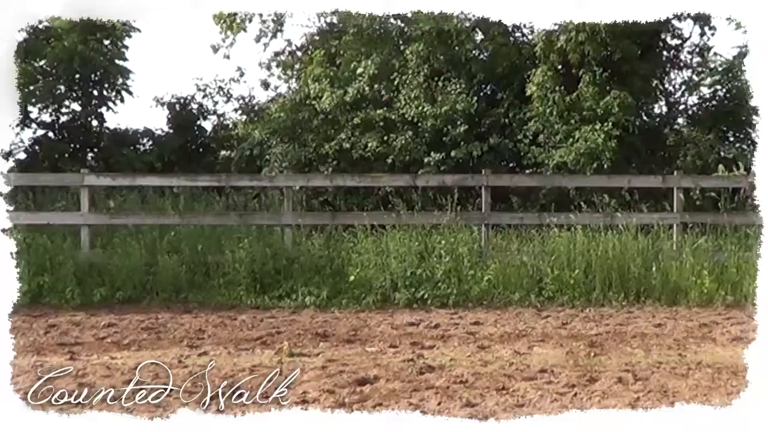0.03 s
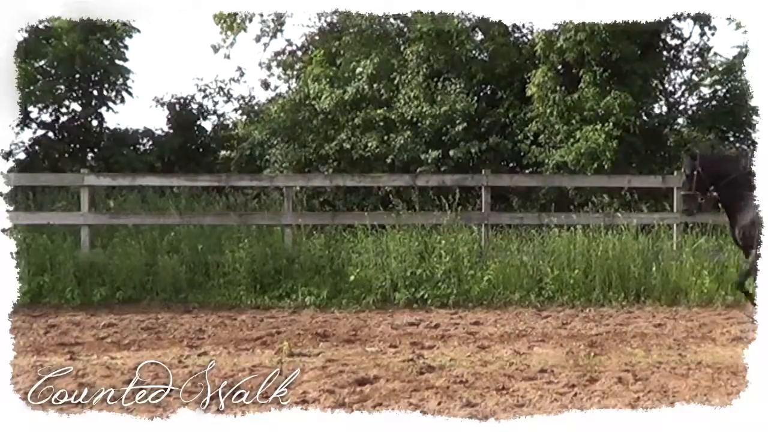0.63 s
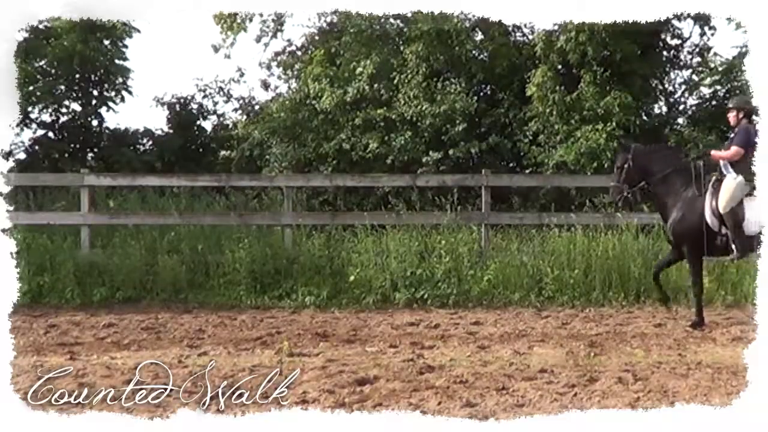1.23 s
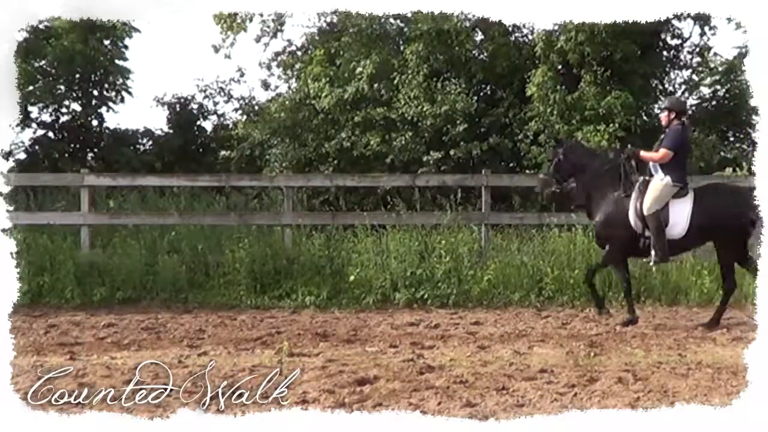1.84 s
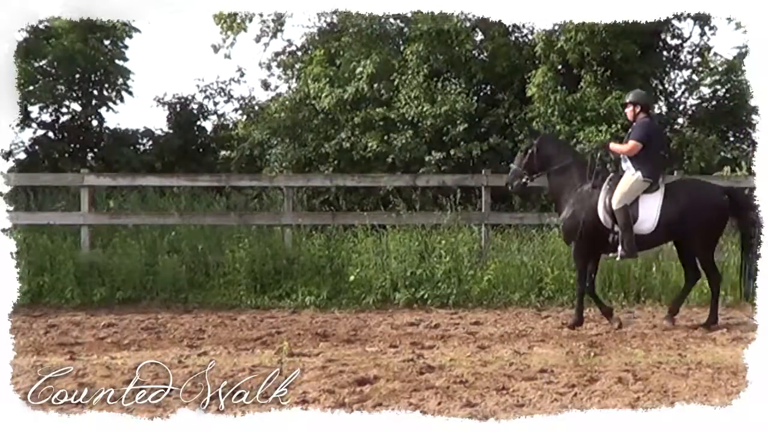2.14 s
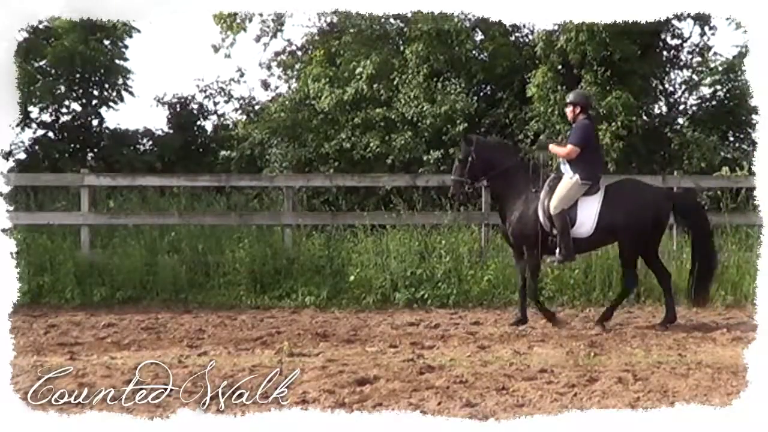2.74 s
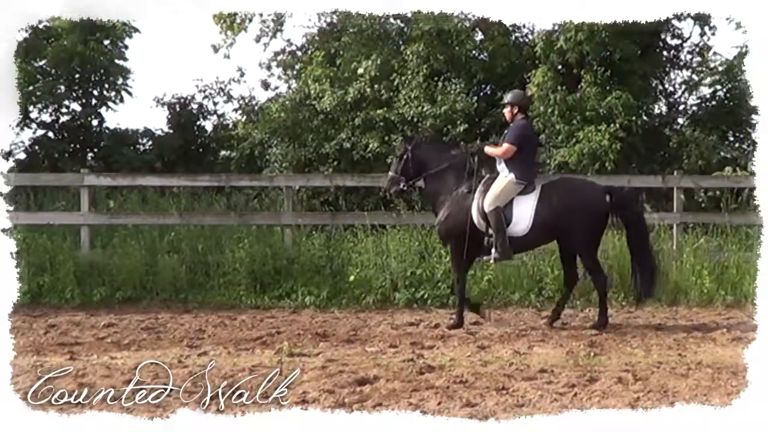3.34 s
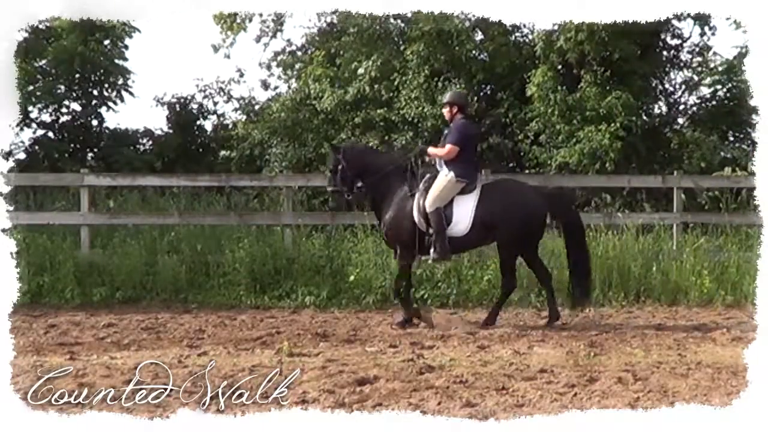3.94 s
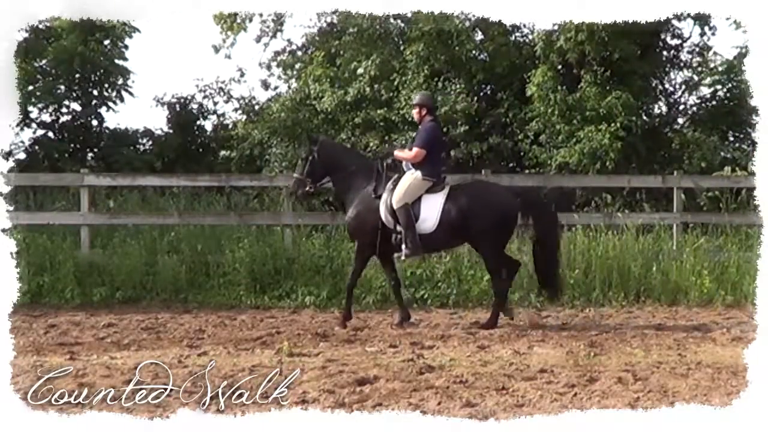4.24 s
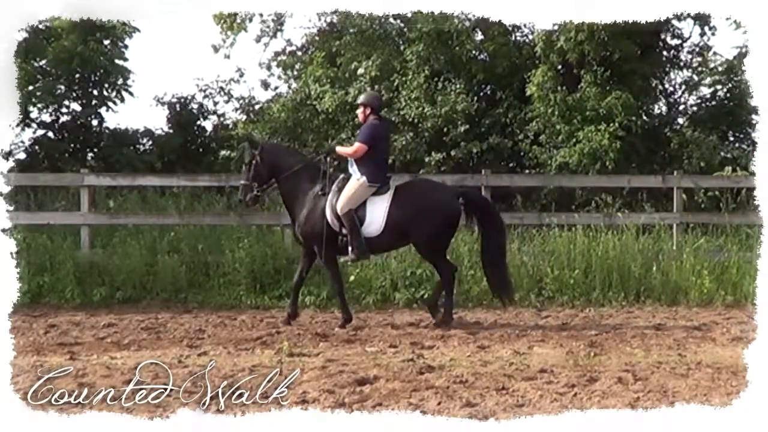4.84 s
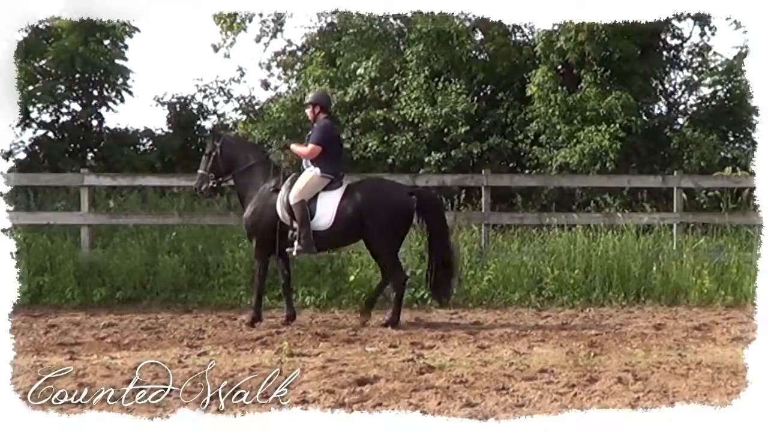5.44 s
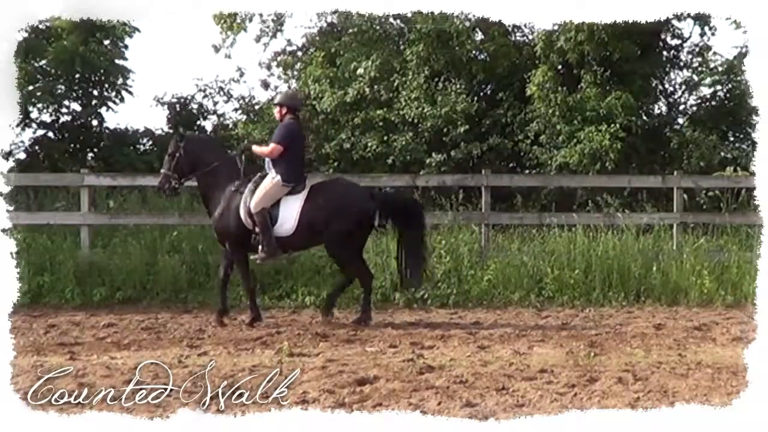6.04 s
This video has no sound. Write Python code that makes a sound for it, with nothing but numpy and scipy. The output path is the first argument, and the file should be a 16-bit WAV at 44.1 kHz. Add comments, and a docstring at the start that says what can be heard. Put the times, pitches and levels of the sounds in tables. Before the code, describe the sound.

Birds chirp and trill over a low outdoor rumble while a horse walks softly on sand with faint tack clicks.

```python
"""Birdsong around a riding arena

Birds sing in the trees while a horse walks slowly across sand, hooves knocking and scuffing, tack ticking.
A near songbird on the right slurs and trills; a farther one warbles, others whistle, chip and chuck.
The songs are gliding, fluttering tones; the chucks are puffs of noise ringing a small throat.
Underneath lie a low country rumble, a far hum, a distant engine that grows and a faint, thin whine."""
import sys
import numpy as np
from scipy import signal
from scipy.fft import rfft, irfft
from scipy.io import wavfile
from scipy.ndimage import uniform_filter1d, map_coordinates

SR = 44100
rng = np.random.default_rng(int(sys.argv[2]) if len(sys.argv) > 2 else 0)


def waveform_to_disk(signal):
    """Save audio, clipped to [-1, 1], as 16-bit WAV at the path in sys.argv[1]."""
    frames = np.transpose(np.atleast_2d(signal))
    scaled = np.clip(frames, -1, 1) * 32767
    samples = np.round(scaled).astype(np.int16)
    wavfile.write(sys.argv[1], SR, samples)


N = 268569
TIME = np.arange(N) / SR

# Table levels are relative, set ahead of the mix.
# The tone of the country air. Each row: frequency in Hz, level in dB.
AIR_SPECTRUM = [(25, -60), (48, -54), (64, -19.5), (80, -14.5), (126, -4.5), (246, -3.5), (359, -14),
                (552, -16), (1340, -14.5), (1660, -20.5), (2700, -20), (4380, -21), (8000, -28),
                (15500, -31.5)]
# How alike the air is left and right. Each row: frequency in Hz, correlation (1 is mono).
AIR_LIKENESS = [(60, 0.97), (200, 1), (380, 0.74), (700, 0.21), (1290, 0.25), (2400, 0.38), (4400, 0.44),
                (8000, 0.57), (12000, 1), (15000, 1)]
# Narrow humps that colour the air. Each row: centre in Hz, width in Hz, boost in dB.
AIR_HUMPS = [(278, 73, 1.5), (1197, 53, 3.5), (5515, 200, 7), (9870, 210, 3.5)]
# The engine's growth. Each row: time in seconds, then levels of harmonics 1, 3 and 4 in dB.
ENGINE_LEVELS = [(0, -74, -82, -81), (2.4, -75, -72, -78), (2.9, -60, -74.5, -68), (3.4, -72, -74.5, -79),
                 (3.85, -68, -63, -65), (4.2, -64, -62, -68), (4.5, -62, -72, -64.5),
                 (4.8, -60.5, -75, -63.5), (5.05, -53.5, -66.5, -69.5), (5.5, -55.5, -70, -69.5),
                 (6.09, -56.5, -67.5, -66)]
# Weaker engine lines. Each row: multiple of the firing rate, level against harmonic 3 in dB.
ENGINE_WEAK_LINES = [(4.5, -7.5), (5, -19)]
# The far hum coming and going. Each row: time in seconds, level in dB.
HUM_LEVELS = [(0.1, -79), (0.27, -55), (1.18, -69.5), (2.21, -65), (2.33, -76), (2.41, -61.5),
              (4.53, -65.5), (5.05, -52), (5.3, -65.5), (6.08, -61.5)]
# Hooves pushing through sand. Each row: middle in seconds, length in seconds, level in dB.
HOOF_SCUFFS = [(0.21, 0.089, -55.5), (0.694, 0.17, -50), (2.19, 0.16, -57.5), (2.372, 0.22, -57),
               (2.471, .1, -51.5), (3.824, 0.11, -55.5), (4.267, 0.066, -57), (4.917, 0.073, -61),
               (5.877, 0.15, -58), (6.051, 0.048, -57.5)]
# The tone of the crunch. Each row: frequency in Hz, level in dB.
SAND_SPECTRUM = [(150, -32), (350, -5), (650, 4), (1100, 1.5), (1600, -9), (3000, -11), (6000, -17),
                 (15000, -41)]
# The warbler's flick. Each row: delay and length in seconds, start, middle and end in Hz, level in dB.
FLICK_NOTES = [(0, 0.048, 2740, 2810, 2780, -53.5), (.038, .062, 2794, 3044, 2130, -45)]
# Its three flicks. Each row: start in seconds, gain in dB, pitch factor.
FLICK_REPEATS = [(0.217, -1, 0.99), (3.183, 0.5, 0.98), (5.411, -1, 1)]
# Its long phrases, one curve apiece. Each row: time in seconds, pitch in Hz, level in dB.
WARBLE_CURVES = [
    [(0.66, 3020, -57), (0.685, 2520, -50), (0.71, 2270, -46), (0.728, 2388, -43), (0.738, 2480, -56),
     (0.746, 2335, -44), (0.768, 2060, -46), (0.792, 2050, -46), (0.82, 2210, -44), (0.844, 2195, -53),
     (0.862, 2170, -51), (0.892, 2350, -44.5), (0.945, 2340, -38.5), (0.995, 2332, -52)],
    [(2.06, 3043, -52), (2.102, 2427, -46), (2.124, 2479, -47), (2.14, 3000, -48), (2.255, 3050, -48),
     (2.284, 2555, -46), (2.33, 2540, -48)],
    [(3.635, 2350, -50), (3.663, 2700, -44.5), (3.701, 2410, -39), (3.733, 2366, -47.5), (3.773, 2080, -46),
     (3.813, 2283, -41.5), (3.85, 2130, -51)],
    [(4.235, 3210, -59), (4.243, 3190, -45), (4.337, 2400, -42.5), (4.355, 2698, -66), (4.391, 2470, -41.5),
     (4.47, 2516, -44)],
    [(5.91, 2973, -51), (5.956, 2299, -47), (5.98, 2450, -47), (6.012, 2048, -45), (6.044, 2043, -45.5),
     (6.058, 2240, -48), (6.085, 2180, -50)],
]
# Its single slurs. Each row: start and length in seconds, start, middle and end in Hz, level in dB.
WARBLER_SLURS = [(0.726, .02, 2400, 2700, 2950, -49), (1.397, 0.078, 2680, 2825, 2840, -46.3),
                 (1.463, 0.096, 2160, 2186, 2245, -47.5), (1.571, 0.041, 2910, 3060, 3000, -45),
                 (1.604, 0.06, 2735, 2550, 2560, -47.5), (5.663, 0.028, 3430, 2970, 2700, -53)]
# Small clicks of the tack. Each row: start in seconds, level in dB.
TACK_TICKS = [(.312, -40.5), (.44, -38), (.775, -37), (1.07, -43), (1.236, -41), (2.124, -37.5),
              (4.506, -42.5), (4.733, -45), (5.662, -40), (6.047, -40)]
# Hoarse chucks. Each row: start in seconds, length in seconds, level in dB.
CHUCK_CALLS = [(0.361, 0.056, -54.5), (1.424, 0.044, -57), (2.686, 0.093, -60), (4.043, 0.051, -57),
               (4.085, 0.057, -54), (4.859, 0.025, -50), (5.335, 0.027, -63)]
# The chucking bird's throat. Each row: resonance in Hz, width in Hz, level in dB.
THROAT_RESONANCES = [(1656, 160, 7.5), (1910, 130, 7.5), (3960, 1400, -6.5)]
# Hooves landing. Each row: start in seconds, level in dB, pitch the thud settles on in Hz.
HOOF_KNOCKS = [(.371, -39.5, 467), (0.592, -40.5, 560), (1.236, -39, 1160), (2.124, -38.5, 400),
               (2.145, -38.5, 503), (2.184, -39.5, 422), (2.476, -42, 900), (4.184, -33.5, 470),
               (4.261, -39, 660), (4.505, -35, 1213), (4.931, -35, 560), (5.662, -29.5, 600),
               (5.823, -39, 840)]
# Thin chips; the last row is a tone ringing with the chuck at 4.859 s. Each row: start and length in seconds,
# start, middle and end in Hz, level in dB.
CHIP_NOTES = [(0.755, 0.037, 4340, 4350, 4230, -54), (1.812, 0.022, 9050, 7560, 6840, -45),
              (1.827, 0.082, 6950, 7200, 7450, -46), (2.966, 0.022, 5560, 5550, 5500, -52),
              (3.013, 0.034, 5800, 5320, 5760, -52.5), (4.859, 0.021, 4100, 3980, 3900, -50.5)]
# A flat whistle with an upturned end. Each row: time in seconds, pitch in Hz, level in dB.
WHISTLE_CURVE = [(1.757, 3800, -66), (1.768, 3828, -52.5), (1.79, 3730, -52), (1.81, 3830, -45.5),
                 (1.874, 3790, -44.5), (1.898, 4064, -40.5), (1.912, 4060, -60)]
# The near songbird's two syllables.
# Each row: delay and length in seconds, start, middle and end in Hz, level in dB.
SWEEP_NOTES = [(0, .038, 4110, 4100, 3400, -41), (.056, 0.035, 4400, 4745, 4680, -38.7),
               (.097, .107, 7600, 6350, 5650, -40)]
SPIKE_NOTES = [(.002, .065, 5224, 4950, 4510, -37.5), (.071, .024, 5300, 6600, 8400, -39),
               (.095, .017, 8300, 6650, 5400, -43), (.126, .08, 2880, 3505, 3190, -44)]
# It sings each twice. Each row: start in seconds, gain in dB, pitch factor.
SWEEP_REPEATS = [(3.09, -4.5, 0.98), (3.362, -0.5, 0.99)]
SPIKE_REPEATS = [(3.656, -0.18, 1.005), (3.93, 0, .995)]
# Its slide. Each row: share of the length, pitch in Hz, level in dB, buzz depth in Hz.
SLIDE_CURVE = [(0, 7400, -6, 450), (.25, 7200, -2.5, 450), (.48, 6750, -0.5, 281), (.68, 6100, -2.5, 111),
               (.87, 5400, -1, 60), (1, 4400, -2, 40)]
# One slide leads into each trill. Each row: start and length in seconds, level in dB, pitch factor.
SLIDE_REPEATS = [(4.23, .081, -40, 0.98), (4.561, 0.077, -41, 0.99)]
# Its two trills. Each row: first crest and period in seconds, level in dB,
# pitch the crests settle on in Hz, fade per crest in dB.
SONG_TRILLS = [(4.3282, .0271, -33.6, 4820, .85), (4.6382, .0288, -34.6, 4470, 3.1)]
# The song runs out in a falling rasp under a held tone.
# Each row: start and length in seconds, start, middle and end in Hz, level in dB, buzz depth in Hz.
CLOSING_NOTES = [(4.68, .1, 4300, 3950, 3350, -51.5, 600), (4.7, .09, 4560, 4510, 4450, -51, 60)]
# The quick fade-in. Each row: time in seconds, gain in dB.
FADE_IN = [(0, -60), (.08, -52), (.1, -28), (.107, 0)]


def gain_of(db):
    """Decibels to a factor."""
    return 10 ** (np.asarray(db) / 20)


def unit_rms(x):
    """Scales to rms 1."""
    return x / np.sqrt(np.mean(x ** 2) + 1e-20)


def spectrum_at(points, hz):
    """Reads a spectrum table on a log-frequency axis."""
    f, value = np.transpose(points)
    return np.interp(np.log(hz + 1), np.log(f + 1), value)


def add(mix, s, sound):
    """Mixes a sound in at s seconds."""
    part = mix[max(round(s * SR), 0):][:len(sound)]
    part += sound[:len(part)]


def filtered(x, gain):
    """Shapes the tone with the curve gain(hz)."""
    return irfft(rfft(x) * gain(np.fft.rfftfreq(x.shape[-1], 1 / SR)), x.shape[-1])


def wander(hz):
    """A smooth random wobble of rms near 1 that turns about hz times a second."""
    knots = rng.standard_normal(4096)
    return map_coordinates(knots, [TIME[::32] * hz], order=3, mode="wrap").repeat(32)[:N]


def outdoors(x, left_db, left_lag_ms, near_db, trees_db, t60, slap_s=0.1, slap_db=-22):
    """Pans a source and adds scatter from ground and fence, a thin tail and a slap from the trees."""
    t = np.arange(SR) / SR
    taps = rng.choice([-1., 1.], (3, 2, SR)) * (rng.random((3, 2, SR)) < [[[1/4]], [[1/20]], [[1/20]]])
    near = taps[0] * np.exp(-t / .003)
    trees = taps[1] * gain_of(-60 * t / t60) * (1 - np.exp(-t / 0.0033))
    slap = taps[2] * (t > slap_s) * np.exp(-abs(t - slap_s) / 0.0065)
    echo = sum(gain_of(db) * path / np.linalg.norm(path, axis=1, keepdims=True)
               for path, db in [(near, near_db), (trees, trees_db), (slap, slap_db)])
    left = map_coordinates(x, [np.arange(N) - left_lag_ms * SR / 1000], order=3)
    pan = gain_of([[min(left_db, 0)], [min(-left_db, 0)]])
    # echoes are a little less one-sided than the direct sound
    return pan * np.array([left, x]) + pan ** .75 * signal.oaconvolve(x[None], echo, axes=1)[:, :N]


def air(level_db=-50.5, patchy_db=1.2, swell_db=0.62):
    """Country rumble and hiss; the mids drift in patches while the top stays even."""
    frames, hz = N // 512 + 5, np.fft.rfftfreq(2048, 1 / SR)
    a, b, c, d, patches = rng.standard_normal((5, frames, len(hz)))
    patches = unit_rms(uniform_filter1d(uniform_filter1d(patches, size=7, axis=0), size=18, axis=1))
    swell = np.interp(np.linspace(0, TIME[-1], frames), TIME, wander(3.8))[:, None]
    likeness = spectrum_at(AIR_LIKENESS, hz)
    left = a + 1j * b
    right = likeness * left + np.sqrt(1 - likeness ** 2) * (c + 1j * d)
    humps_db = sum(db * np.exp(-((hz - f) / width) ** 2) for f, width, db in AIR_HUMPS)
    drift_db = (patchy_db * patches + swell_db * swell * hz / (hz + 400)) / (1 + (hz / 7000) ** 4)
    spectra = np.array([left, right]) * gain_of(spectrum_at(AIR_SPECTRUM, hz) + humps_db + drift_db)
    _, bed = signal.istft(spectra.swapaxes(1, 2), nperseg=2048, noverlap=1536)
    return gain_of(level_db) * unit_rms(bed[:, :N])


def engine(firing_hz=130.24, waver=0.0019, fading_db=1):
    """A distant engine's lines waver and fade on their long way through the air."""
    s, *columns = np.transpose(ENGINE_LEVELS)
    first_db, third_db, fourth_db = (np.interp(TIME, s, c) for c in columns)
    turns = np.cumsum(firing_hz * (1 + waver * wander(8))) / SR
    lines = [(1, first_db), (3, third_db), (4, fourth_db)]
    lines += [(k, third_db + db) for k, db in ENGINE_WEAK_LINES]
    return np.sqrt(2) * sum(gain_of(db + fading_db * wander(3.88)) * np.sin(2 * np.pi * k * turns)
                            for k, db in lines)


def far_hum(hz=238.5, waver=0.012):
    """One low, wavering tone comes and goes in the distance."""
    turns = np.cumsum(hz * (1 + waver * wander(12))) / SR
    level = gain_of(np.interp(TIME, *np.transpose(HUM_LEVELS)))
    return np.sqrt(2) * level * np.sin(2 * np.pi * turns)


def hoof_scuffs(grain_db=2.5, grains_per_s=2500, rest_db=-66):
    """Sand grains crunch in a swell under each dragging hoof."""
    grains = rng.standard_normal(N) * gain_of(grain_db * np.minimum(rng.exponential(1, N), 4))
    grains *= rng.random(N) < grains_per_s / SR
    crunch = filtered(grains, lambda f: gain_of(spectrum_at(SAND_SPECTRUM, f)) * f / (f + 60))
    level = np.full(N, gain_of(rest_db))
    for s, length, db in HOOF_SCUFFS:
        add(level, s - length / 2, gain_of(db) * np.hanning(round(length * SR)))
    return level * unit_rms(crunch)


def bird_voice(notes, flutter_db, waver, top_hz=7230, top_db=-13):
    """Sings (start, pitch, gain) notes as nearly pure, fluttering tones that thin out above top_hz."""
    out, flutter, drift = np.zeros(N), unit_rms(wander(140) + wander(45)), wander(260)
    for start, hz, gain in notes:
        unsteady_hz = hz * (1 + waver * np.interp(start + TIME[:len(hz)], TIME, drift))
        strength = gain * np.maximum(1 / np.sqrt(1 + (hz / top_hz) ** 30), gain_of(top_db))
        add(out, start, np.sqrt(2) * strength * np.sin(2 * np.pi * np.cumsum(unsteady_hz) / SR))
    return out * gain_of(flutter_db * flutter)


def note(start, length, start_hz, middle_hz, end_hz, db, buzz_hz=0, buzz_rate=0):
    """A curved glide through three pitches, sometimes with a fast, fading vibrato."""
    t = np.arange(0, length, 1 / SR)
    share = t / length
    eased = share - 0.462 * np.sin(2 * np.pi * share) / (2 * np.pi)  # lingers on the end pitches
    hz = np.polyval(np.polyfit([0, .5, 1], [start_hz, middle_hz, end_hz], 2), eased)
    hz += buzz_hz * (1 - share ** 2) * np.sin(2 * np.pi * buzz_rate * t)
    return start, hz, gain_of(db) * unit_rms(signal.windows.tukey(len(t), 0.38))


def repeats(syllable, sung):
    """The same syllable at each of its times, nudged in level and pitch."""
    notes = [note(*row) for row in syllable]
    return [(s + delay, hz * pitch, gain * gain_of(db))
            for s, db, pitch in sung for delay, hz, gain in notes]


def phrase(curve, fade_s=0.0031):
    """One unbroken note that follows a pitch and level curve."""
    s, hz, db = np.transpose(curve)
    t = np.arange(s[0], s[-1], 1 / SR)
    edges = np.clip(np.minimum(t - s[0], s[-1] - t) / fade_s, 0, 1)
    smooth_hz = uniform_filter1d(np.interp(t, s, hz), size=400, mode="nearest")
    return s[0], smooth_hz, edges * gain_of(np.interp(t, s, db))


def warbler(buzz_start_s=2.14, buzz_length_s=0.16, buzz_hz=120, buzz_rate=75):
    """The farther bird's flicks, slurs and long phrases; one phrase turns buzzy with a ragged vibrato."""
    turns = np.cumsum(buzz_rate * (1 + .45 * wander(110))) / SR
    buzzing = (TIME > buzz_start_s) & (TIME < buzz_start_s + buzz_length_s)
    buzz = buzz_hz * (np.sin(2 * np.pi * turns) - .5) * buzzing
    notes = [(start, hz + np.interp(start + TIME[:len(hz)], TIME, buzz), gain)
             for start, hz, gain in map(phrase, WARBLE_CURVES)]
    notes += repeats(FLICK_NOTES, FLICK_REPEATS) + [note(*row) for row in WARBLER_SLURS]
    return bird_voice(notes, flutter_db=1.56, waver=0.011)


def tack_ticks(decay_s=0.0011, band_hz=(900, 6000)):
    """Buckles and leather give tiny bright clicks."""
    out, t = np.zeros(N), np.arange(SR // 100) / SR
    band = signal.butter(2, band_hz, "band", fs=SR, output="sos")
    for s, db in TACK_TICKS:
        click = signal.sosfilt(band, rng.standard_normal(len(t)) * np.exp(-t / decay_s))
        add(out, s, gain_of(db) * click / abs(click).max())
    return out


def chucking_bird(pulse_hz=280):
    """Ragged puffs ring a small throat."""
    turns = np.cumsum(pulse_hz * (1 + 0.14 * wander(200))) / SR
    puffs = np.exp(-(turns % 1) / 0.69) * rng.standard_normal(N)
    voice = filtered(puffs, lambda f: sum(gain_of(db) / (1 + ((f - hz) / width) ** 2) ** 2
                                          for hz, width, db in THROAT_RESONANCES))
    level = np.zeros(N)
    for s, length, db in CHUCK_CALLS:
        add(level, s, gain_of(db) * signal.windows.tukey(round(length * SR), .6))
    return unit_rms(voice) * level


def hoof_knocks(sag=0.67, decay_cycles=1.24, attack_s=0.00021):
    """A hoof gives a dead thud of a few cycles whose pitch sinks as the ground yields."""
    out, t = np.zeros(N), np.arange(SR // 20) / SR
    attack = 1 - np.exp(-t / attack_s)
    for s, db, hz in HOOF_KNOCKS:
        decay = np.exp(-t * hz / decay_cycles)
        turns = np.cumsum(hz * (1 + sag * (2 * decay - 1) * np.exp(-t / 0.012))) / SR
        add(out, s, -1.31 * gain_of(db) * attack * decay * np.sin(2 * np.pi * turns))
    return out


def chipping_bird():
    """Short, high glides, roughened by a very fast vibrato."""
    notes = [note(*row, buzz_hz=200, buzz_rate=520) for row in CHIP_NOTES]
    return bird_voice(notes, flutter_db=1.0, waver=0.014)


def whistling_bird():
    """One clean, held tone that lifts at the end."""
    return bird_voice([phrase(WHISTLE_CURVE)], flutter_db=1.8, waver=0.0029)


def songbird_syllables():
    """The near bird opens with two syllables of steep glides, each sung twice."""
    notes = repeats(SWEEP_NOTES, SWEEP_REPEATS) + repeats(SPIKE_NOTES, SPIKE_REPEATS)
    return bird_voice(notes, flutter_db=3.0, waver=0.0088)


def slide(s, length, gain_db, pitch, buzz_rate=190, uneven=0.27):
    """A soft, ragged buzz narrows to a clean falling line."""
    t = np.arange(0, length, 1 / SR)
    share, *columns = np.transpose(SLIDE_CURVE)
    hz, db, buzz_hz = (np.interp(t / length, share, c) for c in columns)
    buzz = np.sin(2 * np.pi * np.cumsum(buzz_rate * (1 + uneven * wander(300)[:len(t)])) / SR)
    return s, pitch * hz + buzz_hz * buzz, gain_of(gain_db + db) * signal.windows.tukey(len(t), .1)


def trill(s, period, db, settle_hz, fade_db, top_hz=5050, trough_hz=3750, trough_db=-16, count=6):
    """The pitch swings; the voice snaps open around each crest, and the crests settle lower and fade."""
    swings = np.arange(0, count, 1 / (period * SR)) - .5
    arch = np.cos(np.pi * swings) ** 2
    crest_hz = settle_hz + (top_hz - settle_hz) * np.exp(-np.maximum(swings, 0) / 1.5)
    hz = trough_hz + (crest_hz - trough_hz) * arch ** 0.56
    opening = .5 + .5 * np.tanh(12 * (arch - .55))
    return s - period / 2, hz, gain_of(db - fade_db * swings + trough_db * (1 - opening))


def songbird_ending():
    """The near bird slides into each of two trills and runs out in a rasp."""
    notes = [slide(*row) for row in SLIDE_REPEATS] + [trill(*row) for row in SONG_TRILLS]
    notes += [note(*row, buzz_rate=130) for row in CLOSING_NOTES]
    return bird_voice(notes, flutter_db=1.5, waver=0.0118)


def scene():
    """Birds around the arena, the horse in front, the distance behind."""
    mix = air() + engine() + far_hum()
    mix += outdoors(hoof_scuffs() + tack_ticks(), left_db=-1, left_lag_ms=0.0051,
                    near_db=-4, trees_db=-4, t60=0.51)
    mix += gain_of(-3) * outdoors(warbler(), left_db=-10.5, left_lag_ms=0.02,
                                  near_db=-7.5, trees_db=-5, t60=0.6, slap_s=0.096, slap_db=-10.5)
    mix += gain_of(2.5) * outdoors(chucking_bird(), left_db=3.5, left_lag_ms=0.0055,
                                   near_db=-7, trees_db=-5.5, t60=0.23)
    mix += gain_of(-0.7) * outdoors(hoof_knocks(), left_db=2, left_lag_ms=-0.01,
                                    near_db=-12, trees_db=-9, t60=0.24)
    mix += gain_of(-1.7) * outdoors(chipping_bird(), left_db=4.5, left_lag_ms=0.005,
                                    near_db=-7, trees_db=-5.5, t60=0.12)
    mix += gain_of(1.5) * outdoors(whistling_bird(), left_db=-5.5, left_lag_ms=0.011,
                                   near_db=-19, trees_db=-10.5, t60=1.5, slap_s=0.06, slap_db=-10)
    mix += gain_of(-0.94) * outdoors(songbird_syllables(), left_db=-10.5, left_lag_ms=0.037,
                                     near_db=-7, trees_db=-5, t60=0.5, slap_s=0.052, slap_db=-20)
    mix += gain_of(-1.5) * outdoors(songbird_ending(), left_db=-10.5, left_lag_ms=0.032,
                                    near_db=-5.5, trees_db=-3.5, t60=0.44, slap_s=0.065, slap_db=-21)
    return mix


def record(dry, whine_hz=15734, whine_db=-67, unsteady=.4, cutoff_hz=15950):
    """A thin, unsteady whine joins in; the sound opens after a moment's hush, its very top cut away."""
    whine = gain_of(whine_db) * np.sqrt(2) * np.sin(2 * np.pi * whine_hz * TIME)
    whine *= 1 + unsteady * wander(550)
    opened = (dry + whine) * gain_of(np.interp(TIME, *np.transpose(FADE_IN)))
    lowpass = signal.firwin(1023, cutoff_hz, window=("kaiser", 9), fs=SR)
    return signal.oaconvolve(opened, lowpass[None], "same")


dry = scene()
out = record(dry)
waveform_to_disk(out)
```